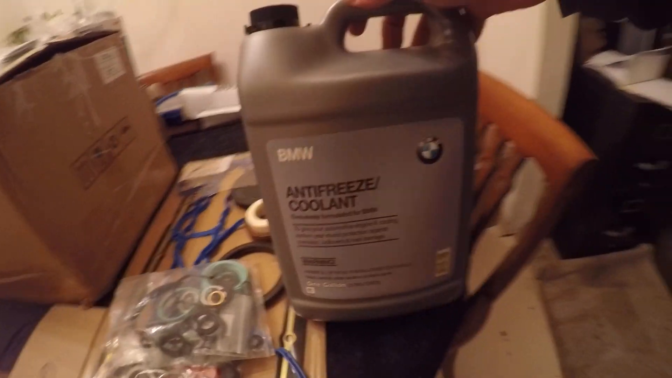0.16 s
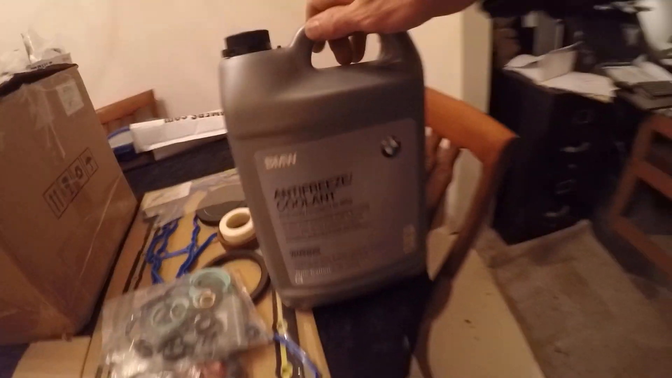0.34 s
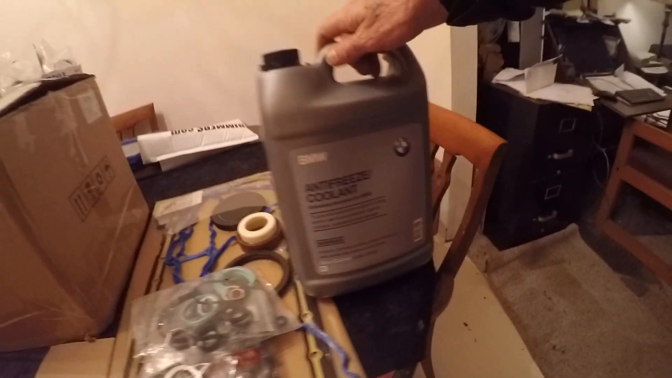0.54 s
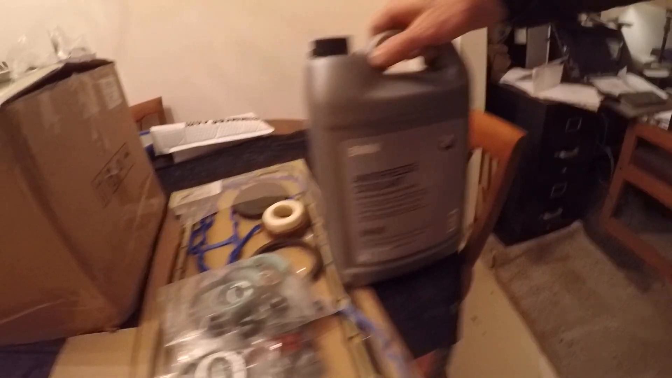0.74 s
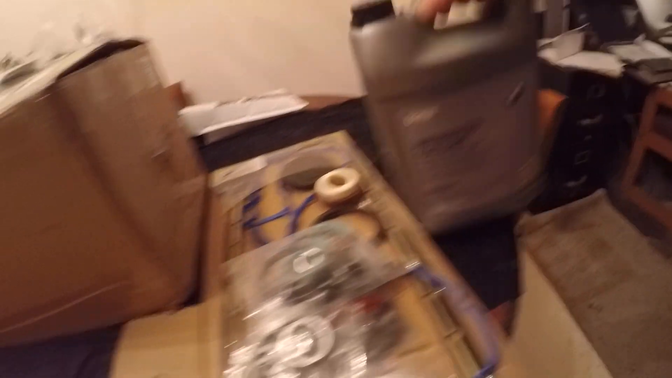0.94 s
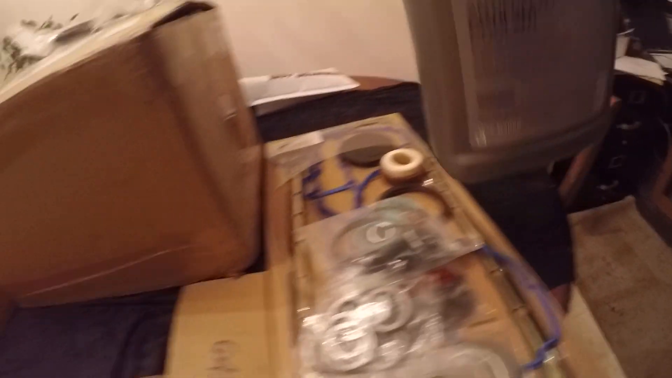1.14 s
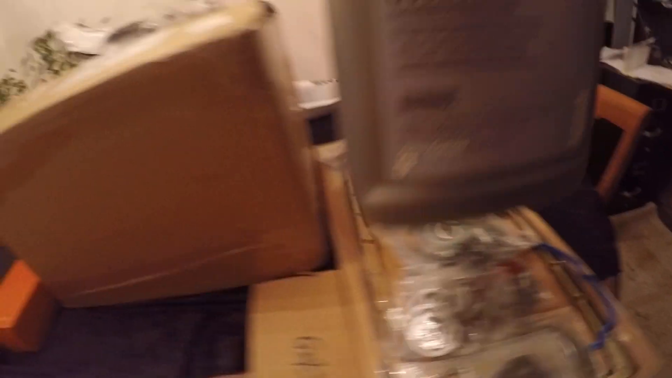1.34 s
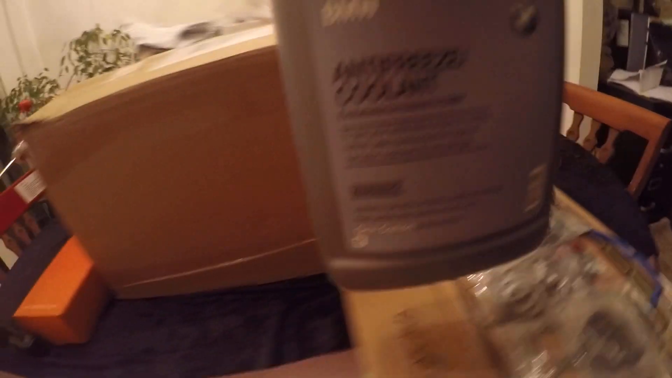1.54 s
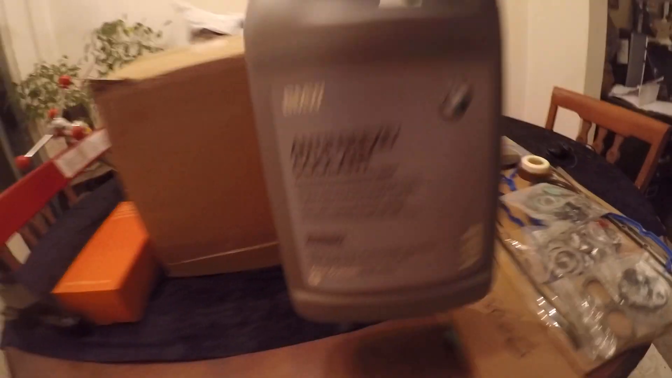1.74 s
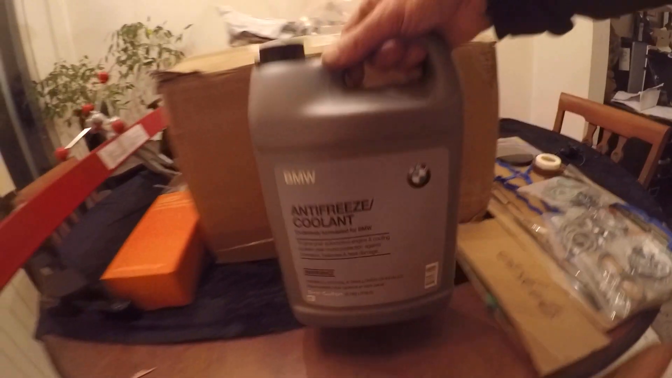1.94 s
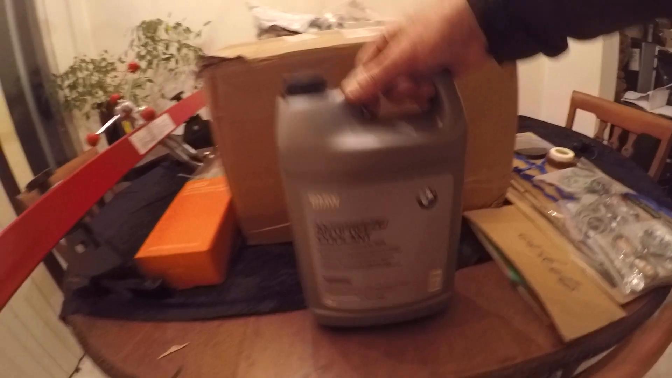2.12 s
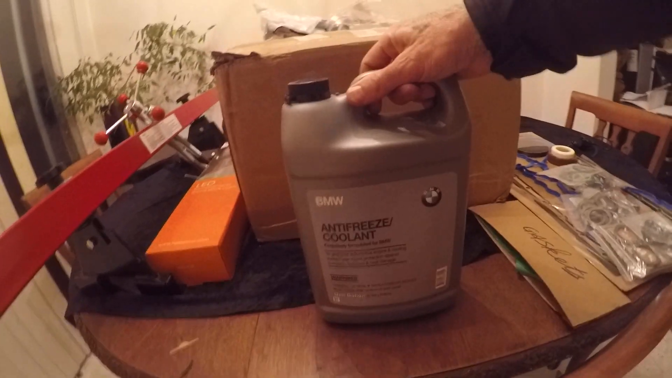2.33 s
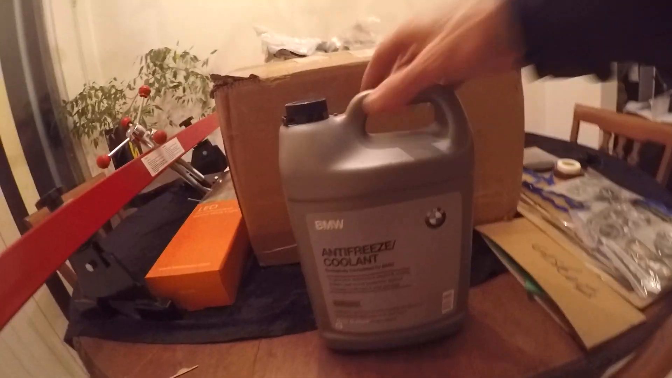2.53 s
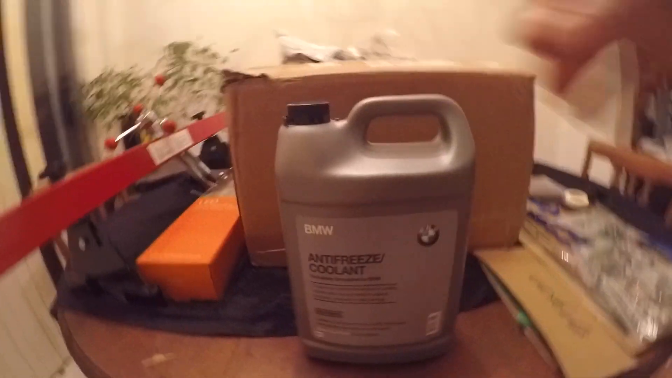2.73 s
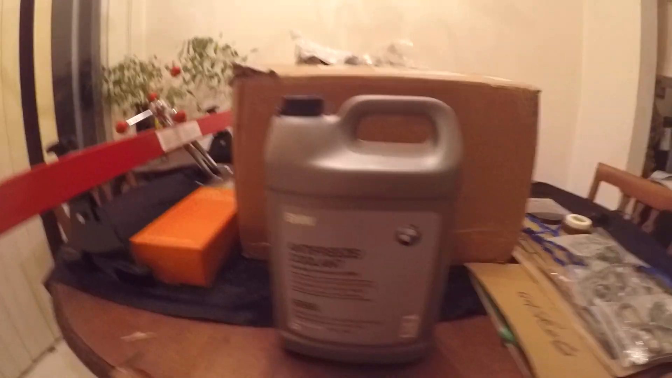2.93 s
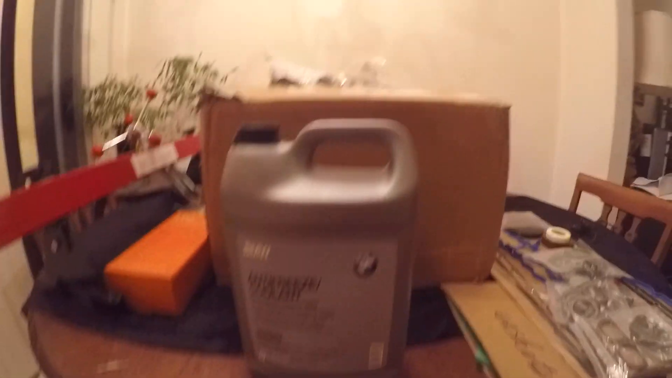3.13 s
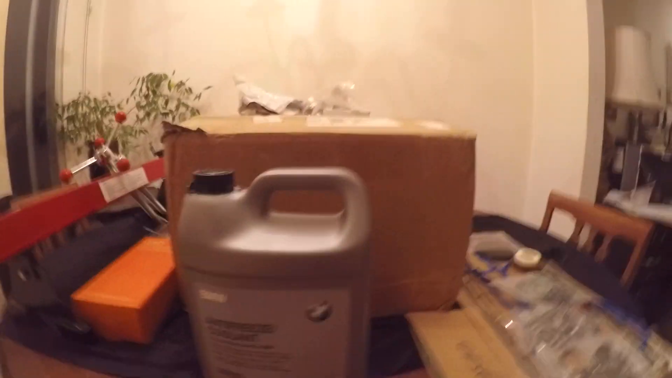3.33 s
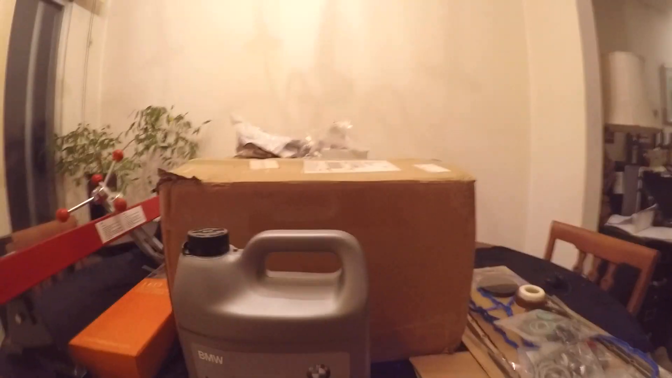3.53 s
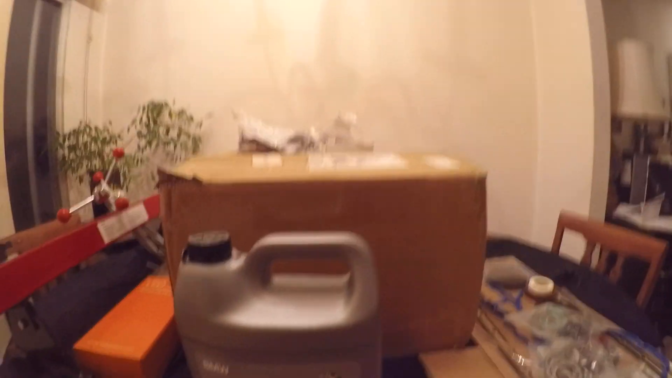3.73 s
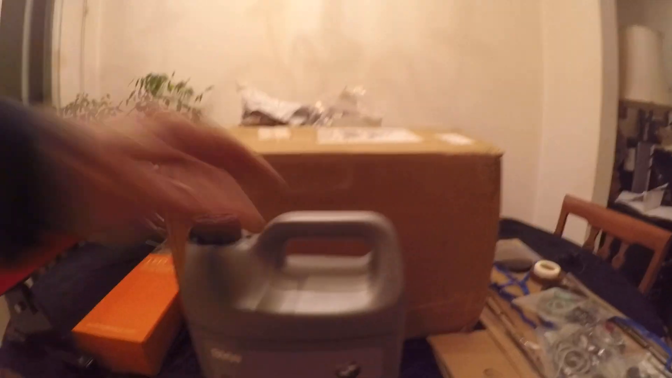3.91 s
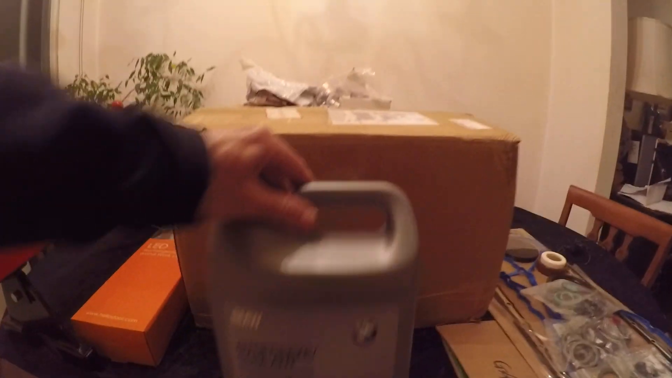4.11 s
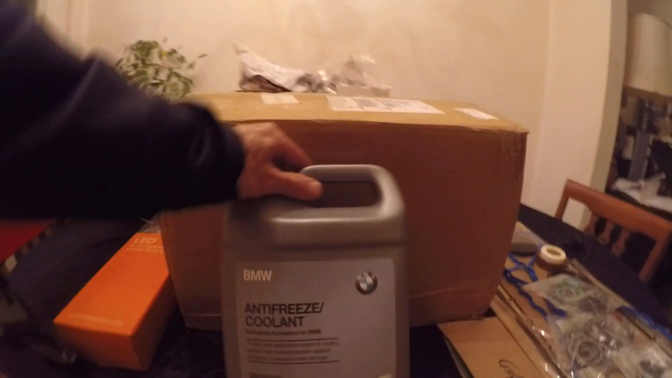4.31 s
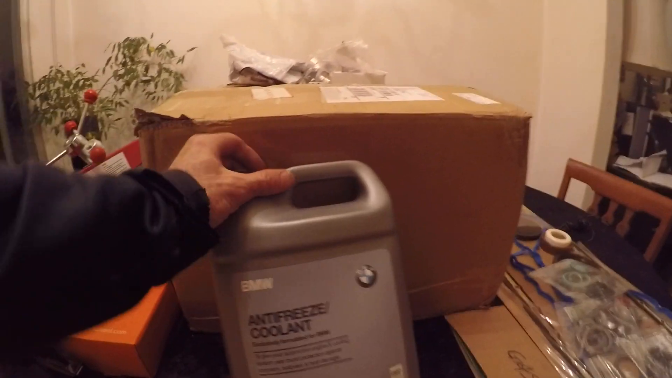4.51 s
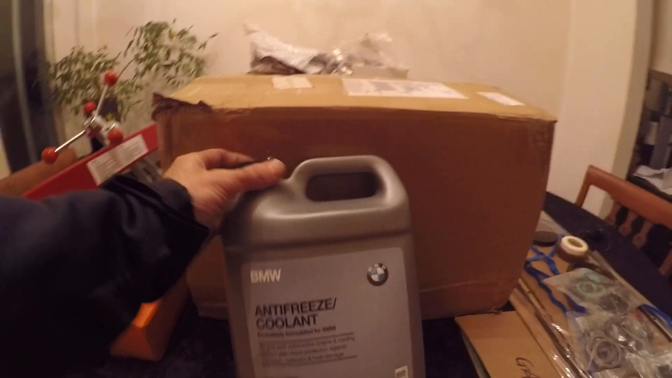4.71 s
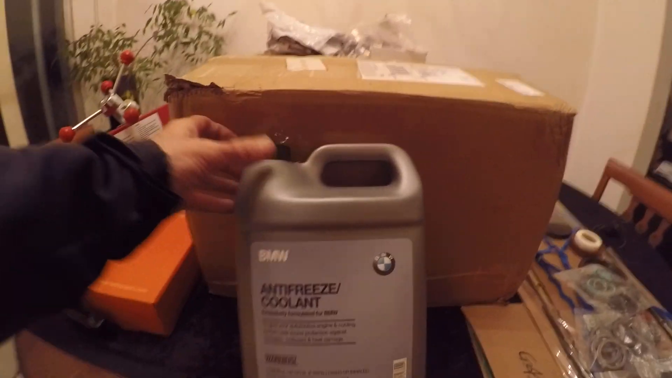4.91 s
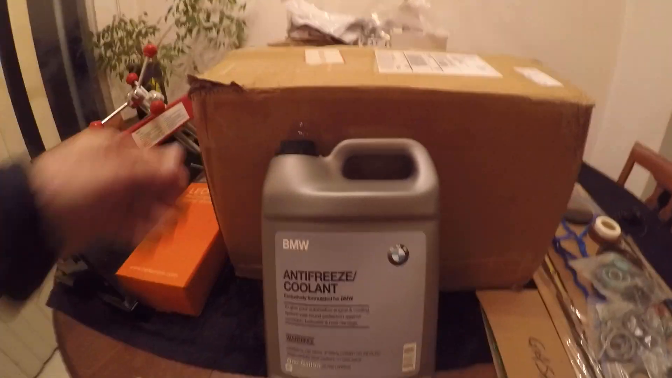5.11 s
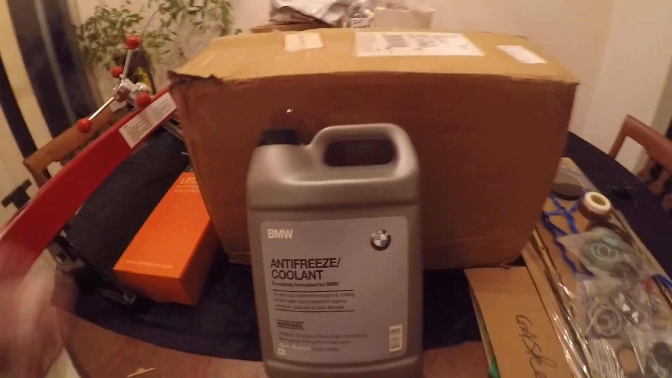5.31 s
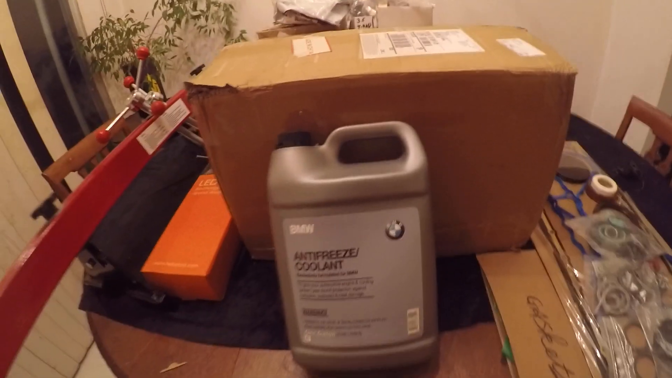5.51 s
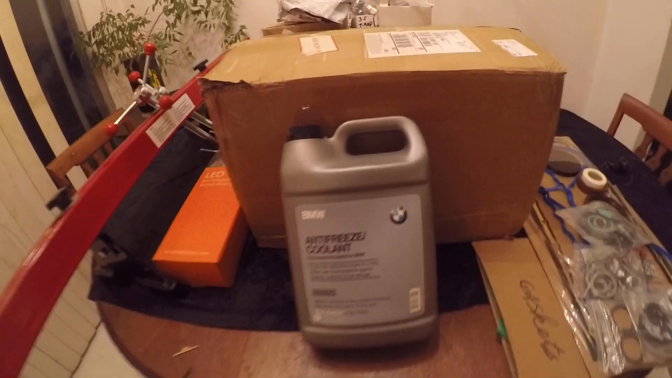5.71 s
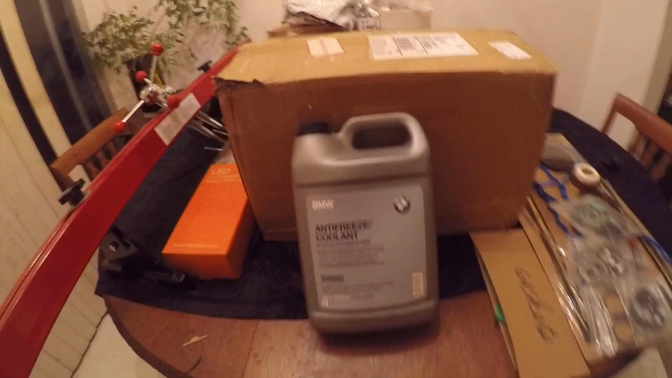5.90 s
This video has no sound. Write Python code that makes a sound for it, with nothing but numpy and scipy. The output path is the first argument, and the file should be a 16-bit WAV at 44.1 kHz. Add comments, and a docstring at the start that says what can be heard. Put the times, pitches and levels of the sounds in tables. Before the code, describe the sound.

Close, body-worn camera sound indoors: low rumble and soft hum under dry fabric rustle. Sharp jacket snaps come first, then small liquid blips, then a heavy multi-part thud as a filled plastic jug is set on a wooden table. Fingers tick on its handle. After a quieter gap the sleeve swishes again and the base knocks the table a few times, with a short room tail.

```python
"""A full plastic jug crosses a small room: liquid bubbles in it over faint hum, room air and camera rumble.
All the while a jacket close to the body-worn camera rubs, swishes, crackles and snaps: shaped noise and clicks.
The jug lands on a wooden table, whose modes boom and sway on its legs while filtered noise rattles.
Fingers tap the handle as resonant bursts; then the jug rocks, its base knocking on the wood as struck modes.
A short room tail, darkening as it dies, follows the jug and table sounds."""
import sys
import numpy as np
from scipy import signal
from scipy.fft import rfft, irfft, next_fast_len
from scipy.io import wavfile
from scipy.ndimage import map_coordinates

SR = 44100
rng = np.random.default_rng(int(sys.argv[2]) if len(sys.argv) > 2 else 0)


def dump_mix(stems):
    """Bounce the given channels to the path in sys.argv[1] as a 16-bit WAV at rate SR."""
    frames = np.atleast_2d(stems).T  # one column per channel
    limited = np.clip(frames, -1, 1)  # hard clip at full scale
    pcm = np.round(limited * 32767).astype(np.int16)
    wavfile.write(sys.argv[1], SR, pcm)


N = 262501
TIME = np.arange(N) / SR  # seconds into the scene
AGE = np.arange(SR) / SR  # seconds since one struck or plucked event began


def amp(db):
    """Decibels to gain."""
    return 10 ** (np.asarray(db) / 20)


def unit(x):
    """Scale to rms 1."""
    return x / np.sqrt(np.mean(x ** 2) + 1e-20)


def along(points, hz):
    """Read a curve of (hz, value) points on a log frequency axis."""
    point_hz, value = np.transpose(points)
    return np.interp(np.log(hz + 1), np.log(point_hz + 1), value)


def wobble(rate):
    """A smooth random curve with the given number of knots a second."""
    knots = rng.standard_normal(int(N * rate / SR) + 4)
    return map_coordinates(knots, [TIME * rate])


def colour(x, spectrum):
    """Filter x by a curve of (hz, gain dB) points, then scale it to rms 1."""
    size = next_fast_len(len(x) + 8192)
    gain = amp(along(spectrum, np.fft.rfftfreq(size, 1 / SR)))
    return unit(irfft(rfft(x, size) * gain, size)[:len(x)])


def noise(spectrum, size):
    """Coloured noise of rms 1."""
    return colour(rng.standard_normal(size), spectrum)


def fade(t60):
    """A free decay that loses 60 dB in t60 seconds."""
    return amp(-60 * AGE / t60)


def band(x, hz, kind, order=2):
    """A causal low-, high- or band-pass."""
    sos = signal.butter(order, np.minimum(hz, SR / 2 - 1), kind, fs=SR, output="sos")
    return signal.sosfilt(sos, x)


def ring(modes, scatter_db, rise_cycles):
    """Struck modes decay as sines after a short build-up; scatter_db varies their strength."""
    out = np.zeros(SR)
    for hz, db, t60 in modes:
        strength = amp(db + scatter_db * rng.standard_normal())
        build_up = 1 - np.exp(-AGE * hz / rise_cycles)
        out += strength * fade(t60) * build_up * np.sin(2 * np.pi * hz * AGE)
    return out


def add(track, s, sound):
    """Mix a sound into the track at time s."""
    part = track[round(s * SR):][:len(sound)]
    part += sound[:len(part)]


def swell(s, db, rise_s, hold_s, release_s):
    """The gain of one movement: it builds up to time s, holds and dies away."""
    swell_db = 20  # gained over the rise, lost over the release
    early = np.maximum(s - TIME, 0) / max(rise_s, 1 / SR)
    late = np.maximum(TIME - s - hold_s, 0) / max(release_s, 1 / SR)
    return amp(db - swell_db * (early + late))


def appliance():
    """Steady machine tones waver slowly in level and phase."""
    # tones of the appliance: hz, mean_level_db (rms)
    tones = [(129.2, -54.5), (236.9, -55), (295.5, -53.5), (414.5, -60), (586.8, -61.5)]
    out = np.zeros(N)
    for hz, db in tones:
        level = amp(db + 1.5 * wobble(4)) * np.sqrt(2)
        out += level * np.sin(2 * np.pi * hz * TIME + .8 * wobble(6))
    return out


def room_air():
    """The air of the room is dark broadband noise that barely drifts in level."""
    # tone of the air: hz, relative_level_db
    air_tone = [(35, -51), (60, -7.5), (96, -4), (129, 2.5), (242, -3.5), (259, -10.5), (291, -7.5),
                (327, -3), (413, -9), (546, -12.5), (599, -12.5), (1320, -22.5), (2250, -32.5), (3120, -34),
                (15500, -44.5)]
    return amp(-44.5 + 0.18 * wobble(2.4)) * noise(air_tone, size=N)


def camera_rumble():
    """Low noise from the camera swells whenever the body jolts it."""
    # body movements: peak_s, rumble_db, rise_s, hold_s, release_s
    jolts = [(0.372, -27.5, .08, 0.096, 0.24), (0.894, -29, .1, .03, 0.21), (2.6, -33, 0.32, 0.34, 0.48),
             (4.054, -37, 0.16, 0.066, 0.16), (4.497, -33.5, 0.3, 0.25, 1)]
    # tone of the rumble: hz, relative_level_db
    rumble_tone = [(10, -7.5), (22, 0.5), (32, -13.5), (44, -8.5), (55, -12), (75, -27.5), (200, -70)]
    idle_db = -39.5  # rumble between jolts
    power = amp(idle_db) ** 2 + sum(swell(*jolt) ** 2 for jolt in jolts)
    return np.sqrt(power) * noise(rumble_tone, size=N)


def friction(gain, spectrum):
    """Threads slide over each other: a fine, uneven grain."""
    roughness_db = 2.7 * rng.standard_normal(N) + 1.7 * wobble(120) + 1.5 * wobble(20)
    grain = rng.standard_normal(N) * amp(roughness_db)
    return gain * colour(grain, spectrum)


def sleeve():
    """Arm strokes swish brightly, or rub with a hollower sound when the arm reaches past the camera."""
    # strokes of the arm: peak_s, level_db, rise_s, hold_s, release_s, hollowness (0-1)
    strokes = [(0.493, -57, 0.16, 0.18, .25, 0), (0.799, -54, .1, 0.023, 0.13, 0),
               (0.956, -48, .06, 0.048, 0.13, 0), (1.528, -59.5, 0.053, .02, 0.17, 0.4),
               (1.883, -55.5, .13, 0.19, 0.42, 0.1), (2.547, -53.5, 0.26, .02, .05, 0),
               (2.682, -60.5, 0.11, 0.02, 0.28, 0.1), (3.992, -57, 0.31, .02, .1, 0.2),
               (4.059, -45.5, 0.038, 0.032, 0.072, 0.1), (4.418, -48.5, 0.21, 0.13, .2, 1),
               (4.729, -49, .2, 0.075, 0.098, 0.4), (4.95, -54, 0.31, 0.044, 0.21, 1),
               (5.497, -51, 0.26, 0.22, 0.085, 0.87)]
    # tone of the bright swish: hz, relative_level_db
    swish_tone = [(500, -7), (1500, -2), (2200, -4.5), (3000, -0.5), (4700, -3.5), (6000, -1.5), (7700, 1),
                  (9800, -0.5), (11300, -5.5), (15300, -4.5)]
    # tone of the hollow rub: hz, relative_level_db
    rub_tone = [(600, -12), (1500, 1), (2150, 4), (2650, -7.5), (3400, -1.5), (4050, 2), (4800, -3.5),
                (5650, -0.5), (6200, -1), (7200, 3), (9800, -0.5), (11300, -9.5), (12500, -8),
                (14600, -5.5)]
    idle_db = -67.5  # the sleeve never lies quite still
    bright, hollow = np.full(N, amp(idle_db) ** 2), np.zeros(N)  # powers
    for *movement, hollowness in strokes:
        power = swell(*movement) ** 2
        share = np.clip(hollowness, 0, 1)
        bright += (1 - share) * power
        hollow += share * power
    return friction(np.sqrt(bright), swish_tone) + friction(np.sqrt(hollow), rub_tone)


def creasing():
    """A squeezed fold gives way in many tiny random slips, heard as a crackle."""
    # the one squeeze: peak_s, crackle_db, rise_s, hold_s, release_s
    squeeze = (.375, -38.5, .135, .035, .045)
    # tone of the crackle: hz, relative_level_db
    crackle_tone = [(700, -9), (1150, -15), (1700, 1), (2000, 3.5), (2400, 1.5), (2900, -11), (4000, -7),
                    (5100, -9.5), (6200, -11), (7300, -6.5), (10000, -10.5), (11700, -28), (15500, -27)]
    slips_per_s = 2600
    slips = (rng.random(N) < slips_per_s / SR) * rng.standard_normal(N)
    slips = slips * amp(3 * rng.standard_normal(N))
    return swell(*squeeze) * colour(slips, crackle_tone)


def fabric_snaps():
    """Stiff fabric lets go in single bright ticks, and the taut fold rings with them."""
    # snaps of the jacket: start_s, tick_peak_db, relative_fold_db
    snaps = [(0.344, -34, -14), (0.357, -30.5, 0), (0.363, -26.5, -2.5), (0.388, -29, 1),
             (0.4003, -19.5, -6), (0.4045, -21.5, -3), (0.4087, -20.5, -22), (0.4295, -28, 5),
             (0.4402, -27, -2), (0.4559, -14.5, 3.5), (0.948, -24.5, -29), (1.3287, -36.5, 0.5),
             (4.031, -30, -26), (4.4898, -21, -28), (5.037, -32.5, -7), (5.48, -22.5, 0),
             (5.4918, -22.5, -5.5)]
    # modes of a taut fold of fabric: hz, relative_level_db, t60_s
    fold_modes = [(700, -13, .008), (1750, -2, .008), (3350, 2, .004), (5000, 3, .004), (9500, -5, .005)]
    out = np.zeros(N)
    for s, db, fold_db in snaps:
        burst = rng.standard_normal(SR) * (fade(0.0022) + amp(-16) * fade(0.03))
        tick = band(burst, [3500, 11000], "band", order=1)
        crack = amp(fold_db - 5) * ring(fold_modes, scatter_db=1, rise_cycles=.12)
        add(out, s, amp(db) * (tick / np.abs(tick).max() + crack))
    return out


def jacket():
    """Stiff fabric swishes as the arm moves, crackles where it creases and lets go in snaps."""
    return sleeve() + creasing() + fabric_snaps()


def slosh():
    """Bubbles ring briefly and rise in pitch inside the jug, each with a little splash."""
    # small bubbles in the liquid: start_s, relative_level_db, start_pitch_hz
    bubbles = [(1.46, -52, 3320), (1.576, -46, 2110), (1.599, -47, 3350), (1.606, -45, 1960),
               (1.692, -45.5, 2260), (1.761, -45, 2290), (3.236, -45, 2170)]
    out = np.zeros(N)
    for s, db, hz in bubbles:
        tone = np.sin(2 * np.pi * hz * AGE * (1 + 3 * AGE))
        splash = unit(band(rng.standard_normal(SR), [hz * 0.44, hz * 1.47], "band"))
        envelope = fade(.04) * (1 - np.exp(-AGE / .001))
        add(out, s, amp(db) * (1.1 * tone + .7 * splash) * envelope)
    return out


def room(x):
    """The furnished room answers briefly, the treble dying first."""
    # decay of the room: hz, t60_s
    room_decay = [(100, 0.79), (500, 0.56), (3000, 0.42), (12000, 0.16)]
    hz, t, z = signal.stft(rng.standard_normal(SR // 2), SR, nperseg=256)
    decay = amp(-60 * t / along(room_decay, hz)[:, None])
    tail = signal.istft(z * decay, SR, nperseg=256)[1]
    delayed = np.pad(tail, (round(.005 * SR), 0))
    tail = band(delayed, 123, "high")
    return signal.fftconvolve(x, tail / np.linalg.norm(tail))[:N]


def table_sway():
    """The table sways on its legs under the new weight: very low decaying sines."""
    # sways: start_s, pitch_hz, level_db, t60_s
    sways = [(2.228, 30, -10.5, .7), (2.336, 40.5, -11, .6)]
    out = np.zeros(N)
    for s, hz, db, t60 in sways:
        add(out, s, -amp(db) * fade(t60) * np.sin(2 * np.pi * hz * AGE))
    return out


def landing():
    """The heavy jug rings the table top, shakes what lies on it and sets the legs swaying."""
    # one edge lands, then the jug drops flat: start_s, relative_force_db, brightness_hz, relative_rattle_db
    contacts = [(2.203, -14, 2200, 1), (2.21, -13.5, 1500, -7), (2.2164, -7.5, 1300, -5),
                (2.248, -9.5, 500, -9.5), (2.312, -18, 160, -9), (2.335, -6, 160, -34)]
    # modes of the loaded table top: hz, relative_level_db, t60_s
    table_modes = [(87, -22, 0.35), (127, -18.5, 0.46), (168, -20, 0.18), (225, -30.5, 0.24),
                   (236, -7, 0.058), (258, -20, 0.14), (340.3, -26.5, 0.36), (431, -27.5, 0.16),
                   (443.6, -19.5, 0.13), (552, -23.5, 0.25), (638, -41.5, 0.21), (702, -22, 0.18),
                   (736, -34, 0.15), (860, -43, .18)]
    # tone of the rattle: hz, relative_level_db
    rattle_tone = [(60, -40), (200, 8), (750, -2.5), (1200, -11.5), (2100, -18), (4000, -25.5),
                   (9000, -32.5), (15000, -44)]
    out = table_sway()
    for s, db, bright_hz, rattle_db in contacts:
        boom = ring(table_modes, scatter_db=4, rise_cycles=0.37)
        add(out, s, amp(db) * band(boom, bright_hz, "low"))
        rattle = noise(rattle_tone, size=SR) * fade(0.28)
        add(out, s, amp(rattle_db - 21.0) * rattle)
    return out


def taps():
    """Fingertips on the hollow handle give a short, rough push to a broad plastic resonance."""
    # finger taps: start_s, peak_db, pitch_hz
    finger_taps = [(2.791, -30, 1240), (2.793, -26.5, 620), (2.801, -25.5, 696), (2.914, -30, 980),
                   (2.964, -34, 990), (3.243, -30.5, 279), (4.289, -25, 960), (4.399, -26.5, 720),
                   (4.814, -30.5, 560), (5.694, -27.5, 850)]
    out = np.zeros(N)
    for s, db, hz in finger_taps:
        push = fade(0.0046) + 0.15 * rng.standard_normal(SR) * fade(0.031)
        body = band(push, [hz * 0.73, hz * 1.36], "band")
        edge = amp(-15.5) * band(push, [hz, hz * 5], "band", order=1)
        wall = body + edge
        add(out, s, amp(db) * wall / np.abs(wall).max())
    return out


def knocks():
    """The rocking base strikes the wood; a softer contact dulls the knock and leaves mostly thud."""
    # knocks of the base: start_s, relative_level_db, relative_thud_db, brightness_hz
    base_knocks = [(4.372, -12.5, 6, 480), (4.514, 1.5, -2, 3600), (4.7581, -5.5, 0, 3350),
                   (5.0374, -4.5, -2.5, 593)]
    # modes of jug and wood together: hz, relative_level_db, t60_s
    jug_modes = [(68.4, -24.5, 0.24), (147, -17, 0.15), (170.6, -12, 0.093), (217, -17, 0.093),
                 (404, -15.5, 0.035), (480, -15.5, 0.034), (528, -12.5, 0.033), (663, -17.5, 0.046),
                 (762, -17.5, 0.033), (914, -34, 0.057), (1098, -36.5, 0.079), (1340, -39, 0.1),
                 (1910, -57, 0.019), (2660, -31, 0.019)]
    # tone of the contact noise: hz, relative_level_db
    clack_tone = [(200, -1), (600, 11), (1200, -9), (3000, -16), (6000, -14), (15000, -37)]
    out = np.zeros(N)
    for s, db, thud_db, bright_hz in base_knocks:
        # the weight of the liquid acts on the low modes only
        modes = [(hz, level + thud_db * (hz < 300), t60) for hz, level, t60 in jug_modes]
        clack_fade = amp(-20.0) * fade(0.0068) + amp(-31.5) * fade(0.23)
        clack = noise(clack_tone, size=SR) * clack_fade
        struck = ring(modes, scatter_db=0.0, rise_cycles=0.32) + clack
        knock = amp(db) * band(struck, bright_hz, "low")
        add(out, s, knock)
        add(out, s, amp(-17) * room(knock))
    return out


def scene():
    """Everything reaches both channels alike; the jacket is too close for the room to matter."""
    background = appliance() + room_air() + camera_rumble()
    handling = slosh() + taps()
    thump = landing()
    echoes = amp(-11.5) * room(thump) + amp(-9) * room(handling)  # knocks carry their own
    mono = background + jacket() + handling + thump + knocks() + echoes
    return np.array([mono, mono])


def record(dry):
    """The camera rounds off the highest peaks and keeps nothing above its band limit."""
    ceiling, top_hz = .5, 15400
    held = dry / (1 + np.abs(dry / ceiling) ** 8) ** (1 / 8)
    size = next_fast_len(N + 8192)
    kept = np.fft.rfftfreq(size, 1 / SR) < top_hz
    return irfft(rfft(held, size) * kept, size)[:, :N]


dry = scene()
out = record(dry)
dump_mix(out)
```